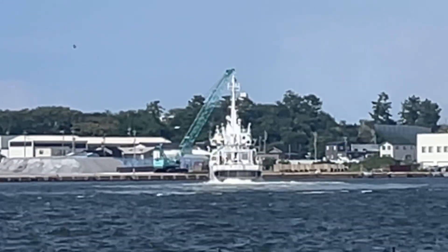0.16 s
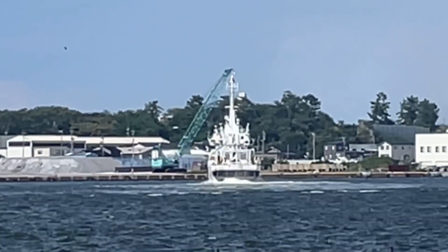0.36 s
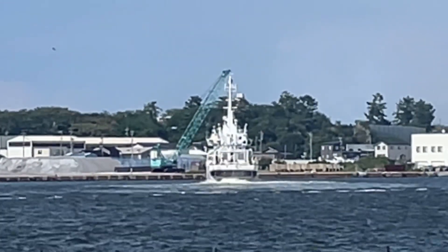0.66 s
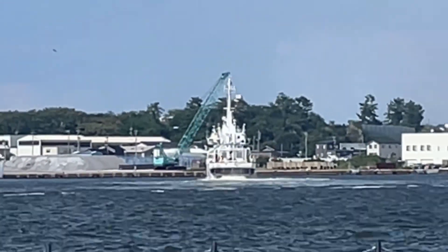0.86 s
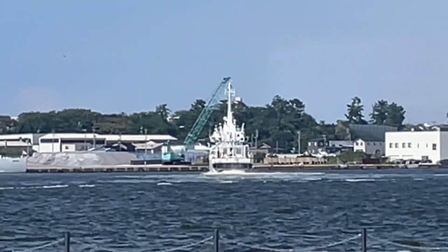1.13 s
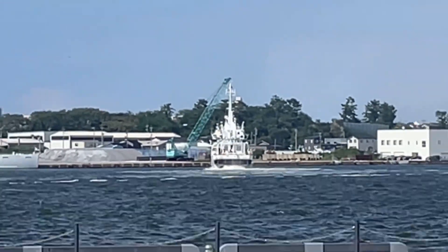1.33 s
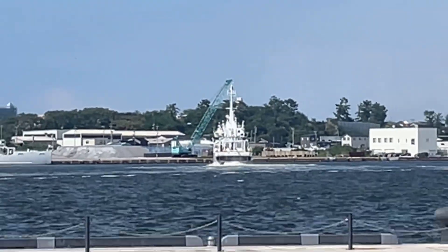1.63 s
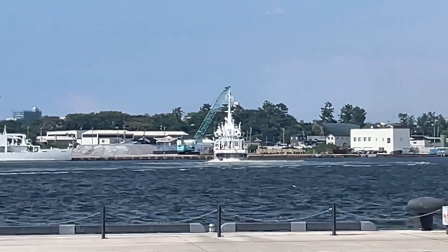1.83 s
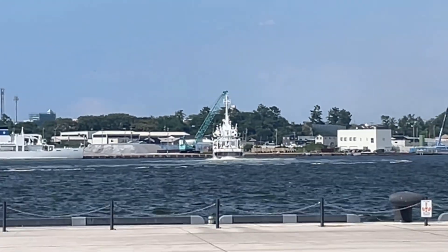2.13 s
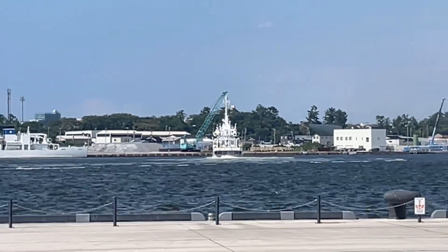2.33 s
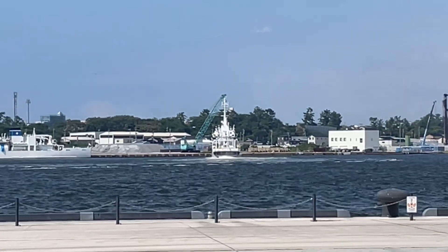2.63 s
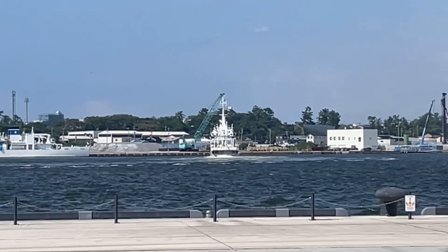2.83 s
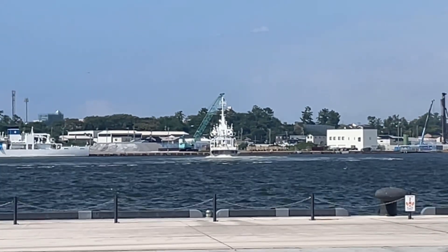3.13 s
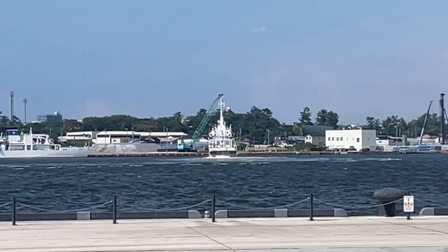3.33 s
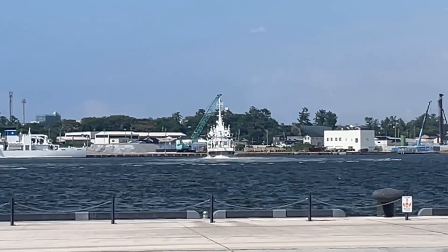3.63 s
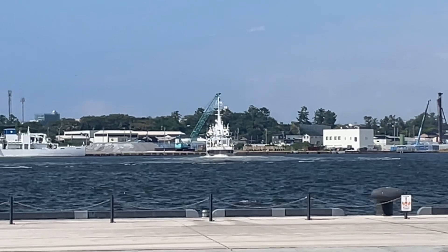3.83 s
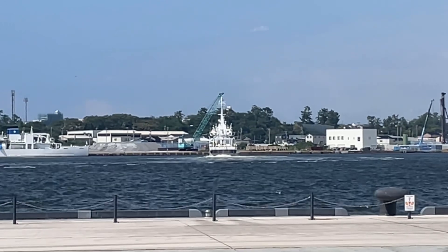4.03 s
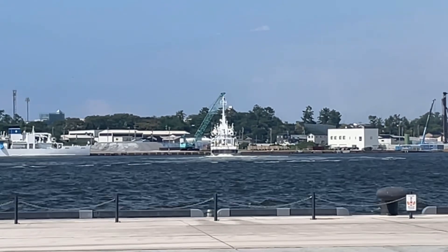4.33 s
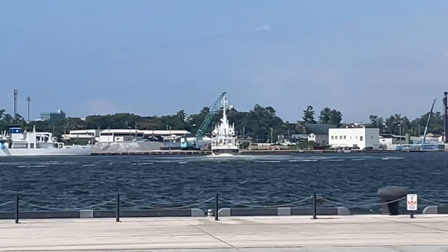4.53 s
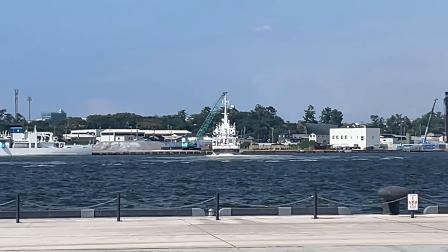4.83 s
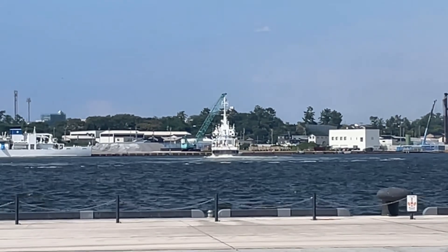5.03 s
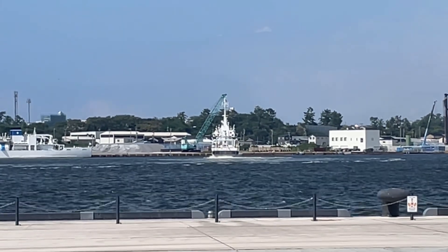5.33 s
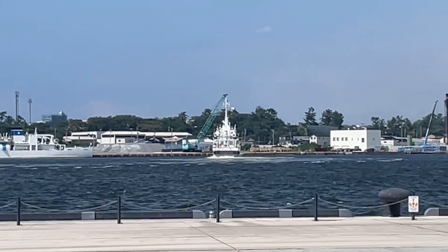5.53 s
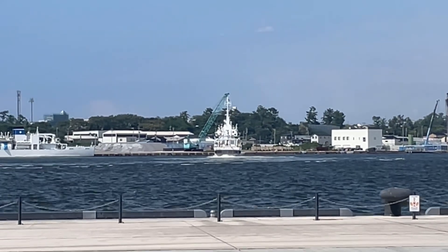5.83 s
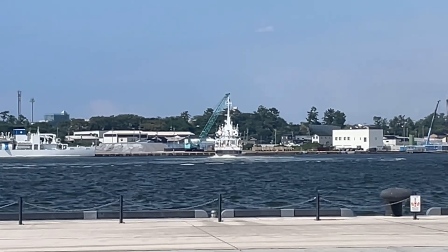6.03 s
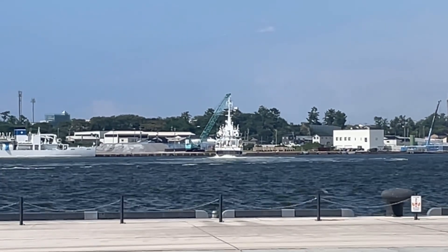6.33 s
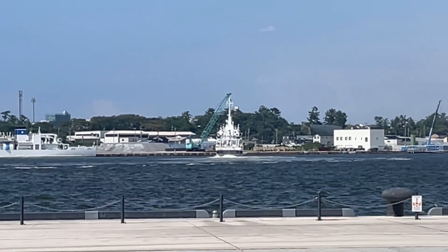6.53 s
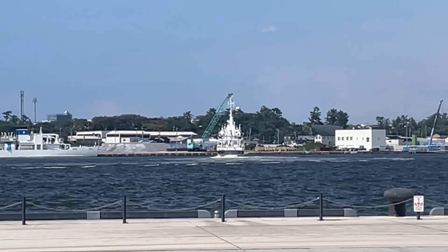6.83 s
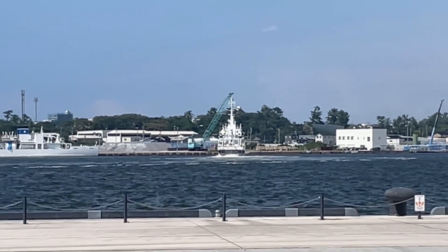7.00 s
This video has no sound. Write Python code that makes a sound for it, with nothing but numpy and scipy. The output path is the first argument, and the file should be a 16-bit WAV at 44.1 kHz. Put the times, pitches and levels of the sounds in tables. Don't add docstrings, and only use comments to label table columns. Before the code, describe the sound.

A distant vessel's low diesel drone pulses over softly hissing water, with small laps, late plops and a rough burst of wind buffeting.

```python
import sys
import numpy as np
from scipy import signal
from scipy.fft import rfft, irfft, next_fast_len
from scipy.io import wavfile
from scipy.ndimage import uniform_filter1d

SR = 44100
rng = np.random.default_rng(int(sys.argv[2]) if len(sys.argv) > 2 else 0)


def undo_db(level):
    steps = np.asarray(level, float) / 20
    return 10 ** steps


def store_wav(level_fs):
    pcm = np.round(np.clip(np.atleast_2d(level_fs), -1, 1) * 32767)
    wavfile.write(sys.argv[1], SR, pcm.T.astype(np.int16))


N = 315800
SIZE = next_fast_len(N)

# frequency in Hz, extra level on the left in dB.
LEAN = [(60, -0.46), (150, 0.7), (500, 0.3), (800, -1), (1700, 1), (3000, -0.9)]


def in_time(rows):
    s, *columns = np.transpose(rows)
    return [np.interp(np.arange(N) / SR, s, column) for column in columns]


def at_hz(points, hz):
    point_hz, value = np.transpose(points)
    return np.interp(np.log(hz), np.log(point_hz), value)


def swells(rows):
    t = np.arange(0, N + 64, 64) / SR
    total_db = sum(db * np.exp(-((t - s) / half_s) ** 2) for s, db, half_s in rows)
    return np.interp(np.arange(N) / SR, t, total_db)


def rms_one(x):
    return x / np.sqrt(np.mean(x ** 2) + 1e-20)


def drift(rate):
    r = np.exp(-200 * np.pi * rate / SR)
    noise = rng.standard_normal(N // 100 + 1002)
    slow = signal.lfilter([1], [1, -2 * r, r * r], noise)[1000:]
    return np.interp(np.arange(N) / 100, np.arange(len(slow)), rms_one(slow))


def spread(mid, side, lean_db=0):
    balance_db = np.reshape([lean_db / 2, -lean_db / 2], (2, -1))
    return (mid + side * np.array([[1], [-1]])) * undo_db(balance_db)


def heard(spectra):
    return irfft(spectra, SIZE)[..., :N]


def coloured(spectrum, alike_share=1., top_hz=20000):
    # frequency in Hz, likeness from 0 to 1.
    likeness = [(60, 0.96), (180, .95), (300, 0.9), (520, 0.2), (890, 0.7), (1800, .5), (2200, 0.97),
                (2700, 1), (6000, 1), (10000, 1)]
    hz = np.maximum(np.fft.rfftfreq(SIZE, 1 / SR), 10)
    colour = undo_db(at_hz(spectrum, hz)) / (1 + (hz / top_hz) ** 4)
    mid, side = rfft(rng.standard_normal((2, SIZE))) * colour
    alike = np.clip(alike_share * at_hz(likeness, hz), 0, 1)
    pair = spread(np.sqrt(1 + alike) * mid, np.sqrt(1 - alike) * side, at_hz(LEAN, hz))
    return hz, pair / np.sqrt(np.mean(heard(pair) ** 2))


def tone(hz, level_db, wander):
    phase = 2 * np.pi * (hz * np.arange(N) / SR + rng.random()) + wander * drift(.3)
    shift = rng.normal(0, 0.0011) * hz
    return np.sqrt(2) * undo_db(level_db) * spread(np.sin(phase), shift * np.cos(phase), at_hz(LEAN, hz))


def pop(clicks, hz, cycles):
    r = np.exp(-hz / cycles / SR)
    resonance = [1 - r * r, 0, r * r - 1, 1, -2 * r * np.cos(2 * np.pi * hz / SR), r * r]
    return signal.sosfilt([resonance, resonance], clicks + 1e-18)


def engines():
    # multiple of the engine cycle, level in dB.
    port = [(11, -40.5), (12, -47.5), (16, -50), (17, -44.5), (18, -47.5), (19, -47), (20, -55.5),
            (21, -71.5), (22, -42), (23, -49), (24, -49.5), (25, -41), (26, -42), (27, -49), (29, -51.5),
            (31, -57.5), (32, -46), (33, -54), (37, -61.5), (38, -56), (42, -72.5), (45, -61), (46, -56.5),
            (48, -63), (50, -73), (54, -65.5)]
    starboard = [(12, -52.5), (18, -42.5), (19, -61.5), (20, -50.5), (23, -41), (26, -49), (29, -46.5),
                 (31, -51.5), (32, -62.5), (37, -50), (38, -62.5), (39, -59.5), (53, -69), (54, -58.5)]
    stack_hz = [81.17, 150.7, 237.9]
    # time in seconds, level in dB.
    firing = [(0, -29.5), (.2, -25.5), (.6, -25), (.85, -31.5), (1.4, -30), (1.95, -26.5), (2.2, -28),
              (2.4, -23), (2.6, -31), (3.1, -26.5), (3.4, -32), (3.95, -37.5), (4.5, -21.5), (5.25, -22),
              (5.6, -34), (6.2, -24.5), (6.6, -36), (7.0, -26)]
    # seconds, change in dB,
    # half-length in seconds.
    second_fades = [(1.05, -2.5, 0.26), (1.43, -24, 0.24), (2.7, -7.5, 0.082), (3.02, -20.5, 0.21),
                    (3.45, -7.5, 0.2), (4.0, -11.5, 0.14), (4.4, -12, .1), (5.35, -20, 0.18),
                    (6.0, -3, 0.24), (6.47, -18.5, 0.2)]
    third_fades = [(.3, -1, 0.1), (1.35, -7.5, .3), (2.0, -7, 0.15), (2.95, -5.5, 0.35), (3.75, -21, 0.2),
                   (4.3, -14, 0.31), (5.05, -12, 0.17), (5.8, -4, 0.078), (7.16, -10.5, 0.16)]
    thirteenth_fades = [(.08, 12.5, 0.055), (.48, -6, 0.29), (2.7, -8, 0.043), (3.35, 2.5, 0.16),
                        (4.4, -24.5, 0.38), (5.52, 7, .09), (6.5, -3.5, .7)]
    port_cycle_hz, starboard_cycle_hz = 5.413, 5.378
    lines = [(k * port_cycle_hz, db) for k, db in port]
    lines += [(k * starboard_cycle_hz, db) for k, db in starboard]
    out = sum(tone(hz, db + 2 * drift(.4), wander=.35) for hz, db in lines)
    strong = [
        (stack_hz[0], in_time(firing)[0]),
        (stack_hz[1], -31.5 + swells(second_fades)),
        (stack_hz[2], -42 + swells(third_fades)),
        (13 * port_cycle_hz, -34.5 + swells(thirteenth_fades))]
    return out + sum(tone(hz, db, wander=.3) for hz, db in strong)


def generator():
    # frequency in Hz, level in dB.
    hum = [(89.1, -37.5), (90.85, -41), (158.7, -38)]
    # time in seconds, change in dB, half-length in seconds.
    fades = [(.97, -11.5, .15), (1.89, -8.5, .25), (2.4, -1, .15), (2.85, 0, .25), (3.5, 2, .2),
             (5.2, 2.5, .4), (5.6, -7.5, .1), (6.6, 0, .6)]
    return sum(tone(hz, db + swells(fades), wander=0.49) for hz, db in hum)


def rumble(gust_db):
    # frequency in Hz, level in dB per Hz.
    spectrum = [(25, -33.5), (45, -2), (60, 8.5), (80, 1), (95, -0.5), (115, -5.5), (145, -1.5), (175, -8),
                (240, -11.5), (300, -16), (420, -25.5), (700, -68)]
    # time in seconds, rise in dB, half-length in seconds.
    air_swells = [
        (.35, 2, 0.17),
        (1.3, -1, 0.42),
        (4.5, 3.5, 1),
        (5.9, 4.5, 0.27),
    ]
    rest_db, gust_share = -31.5, 0.13
    level_db = rest_db + swells(air_swells) + gust_share * gust_db
    return undo_db(level_db + 1.3 * drift(3.6)) * heard(coloured(spectrum, top_hz=720)[1])


def gust_strength():
    return swells([(0, 12, 0.11), (1.25, 10, .35), (5.4, 8, .5), (6.6, 19, 0.4), (6.235, 20.5, 0.062),
                   (6.36, 6.5, .025), (6.452, 12, 0.019), (6.56, 10.5, 0.049), (6.645, 11, 0.025),
                   (6.705, 12, 0.016), (6.86, 14, 0.051), (6.94, 23.5, 0.01), (7.06, 25, 0.032)])


def gusts(gust_db):
    # frequency in Hz, level in dB per Hz.
    spectrum = [(20, -33.5), (40, -11.5), (60, 14.5), (90, 13), (130, -1), (200, -23.5), (350, -27.5)]
    calm_db = -44
    wind = heard(coloured(spectrum, top_hz=350)[1])
    local = np.sqrt(uniform_filter1d(np.mean(wind ** 2, 0), size=2600) + .1)
    return undo_db(calm_db + gust_db) * wind / local ** .7


def splash_db():
    # time in seconds, rise of droplet density in dB.
    splashes = [
        (.8, 2.5),
        (1.3, 7.5),
        (1.92, 12.5),
        (2.8, 3.5),
        (3.5, 4.5),
        (3.8, 9),
        (4.08, 4),
        (6.299, 7),
        (6.92, 6),
    ]
    splash_s, rest_db = .07, 0.8
    return rest_db + swells([(s, db, splash_s) for s, db in splashes])


def wake():
    # frequency in Hz, level in dB per Hz.
    spectrum = [(200, -8), (330, -1), (500, -2.5), (900, -6.5), (1400, -14), (1750, -15.5), (2050, -16),
                (3000, -24.5), (5000, -31), (7000, -38.5), (8400, -39.5), (10500, -51), (12500, -47),
                (15200, -62)]
    # time in seconds, rise in dB, half-length in seconds, pitch in Hz.
    surges = [(0.847, 5.5, 0.18, 1142), (1.796, 3, 0.19, 1360), (2.096, 2.5, .25, 863),
              (2.103, 2.5, 0.32, 2197), (2.756, 1.5, 0.33, 2257), (4.303, 5.5, 1.2, 822),
              (4.3, 2, 1.4, 499), (3.896, 2.5, .2, 2240), (4.348, 6.5, 0.23, 1402), (4.7, 6.5, .25, 1450),
              (5.006, 3, 0.37, 2240), (5.252, 2, .3, 843), (6.499, 4.5, 1, 1360), (6.896, 3.5, 0.44, 950)]
    surge_octaves = .3
    edges_hz = [0, 680, 1080, 1300, 1750, 2900, 5200, 8500, SR]
    centres_hz = [480, 850, 1180, 1500, 2250, 3900, 6600, 11000]
    splash_shares = [0, 0, 0, 0, 0, .2, .24, .3]
    flickers_db = [.3, .3, .3, .3, .3, .4, .7, 1.2]
    hz, pair = coloured(spectrum)
    shared, splash = drift(20), splash_db()
    out = 0
    bands = zip(edges_hz, edges_hz[1:], centres_hz, splash_shares, flickers_db)
    for low, high, centre, share, flicker_db in bands:
        band = 1 / (1 + (low / hz) ** 16) - 1 / (1 + (high / hz) ** 16)
        near = []
        for s, db, half_s, pitch in surges:
            closeness = np.exp(-(np.log2(pitch / centre) / surge_octaves) ** 2)
            near.append((s, db * closeness, half_s))
        db = swells(near) + share * splash
        flicker = flicker_db * (shared + drift(50)) + 0.81 * drift(4.8)
        out = out + undo_db(db - np.mean(db) + flicker) * heard(pair * band)
    return undo_db(-48) * out


def spray():
    sizes = undo_db(4.2 * np.minimum(rng.exponential(1, N), 3.0)) * rng.choice([-1, 1], N)
    drops_per_s = 150 * undo_db(1.5 * splash_db() + 2 * drift(4))
    born = rng.random(N) < drops_per_s / SR
    dealt = rng.integers(0, 8, N)
    pitches = [(2000, 4), (2700, 4), (3300, 0.0), (4200, 2.0),
               (5300, -5.5), (6600, -6.5), (9300, -18.0), (10800, -17)]
    out = 0
    for k, (hz, db) in enumerate(pitches):
        out = out + undo_db(db) * pop(sizes * born * (dealt == k), hz, cycles=0.38)
    return undo_db(-59.5) * out


def ticks(table, cycles, gain_db):
    out, t = np.zeros(N + 600), np.arange(600) / SR
    for (s, db, hz), noise in zip(table, rng.standard_normal((len(table), 600))):
        ragged = .15 * noise * np.exp(-t / .002) * (t < .01)
        ring = pop(np.roll((t == 0) + ragged, 30), hz, cycles)
        start = round(s * SR)
        out[start:start + 600] += undo_db(db + gain_db) * ring / np.abs(ring).max()
    return out[:N]


def laps():
    return ticks([(0.0181, -55.5, 5330), (0.2919, -57.1, 6000), (0.7851, -56, 4700), (0.8825, -54.5, 5310),
                  (0.9836, -56.5, 6800), (1.2606, -50.5, 3730), (1.2845, -52, 5390), (1.3066, -46.6, 4740),
                  (1.3881, -54.5, 5380), (1.5676, -55.5, 5380), (1.8745, -57.5, 6780),
                  (1.8902, -53.0, 4740), (2.8042, -57, 6730), (3.199, -54, 6820), (3.5025, -49.5, 4200),
                  (3.5199, -53.4, 4160), (3.5297, -51.7, 6800), (3.7373, -56, 5340), (3.7893, -52, 4220),
                  (3.8412, -52, 5350), (4.054, -50, 4760), (4.0758, -56.4, 5990), (4.1375, -53.5, 6000),
                  (4.4355, -54, 4740), (4.8555, -51, 6750), (5.2858, -47, 4720), (5.662, -54.9, 5340),
                  (6.2857, -62, 6760), (6.8993, -46.5, 5900)], cycles=0.71, gain_db=1.0)


def bright_drops():
    return ticks([(0.17, -68.5, 9900), (0.254, -71, 10000), (0.2923, -71, 9200), (0.63, -59, 9040),
                  (0.9828, -65.5, 9050), (1.7654, -71, 9080), (1.8262, -71, 9160), (2.5149, -70, 8980),
                  (2.8042, -62.5, 9300), (3.0021, -66, 9000), (3.025, -70.5, 11020), (3.6401, -69, 9000),
                  (3.7808, -70, 10380), (4.0482, -64, 10750), (4.8544, -67.5, 8900), (5.1422, -58.5, 8900),
                  (5.5503, -65.5, 9870), (6.8672, -70, 8840), (6.8987, -55.5, 9680), (7.0, -66, 11400)], cycles=1.1, gain_db=5.5)


def bird():
    start_s, length_s, edge_s = .7, .175, .015
    level_db, sag_db, hz = -75, 7, 7340
    t = np.arange(N) / SR - start_s
    edge = np.clip(np.minimum(t, length_s - t) / edge_s, 0, 1)
    dip_db = sag_db * np.sin(np.pi * np.clip(t / length_s, 0, 1))
    return undo_db(level_db - dip_db) * edge ** 2 * np.sin(2 * np.pi * hz * t)


def plops():
    # start in seconds, level in dB, pitch in Hz, time to fall 60 dB in seconds.
    bubbles = [
        (6.752, -32, 410, .08),
        (7.035, -31, 330, .1),
        (6.41, -38, 370, .08),
        (6.922, -55, 3880, .06),
        (3.489, -52, 3600, .008),
        (2.66, -57, 3850, .02),
    ]
    out, t = np.zeros(N + 4000), np.arange(4000) / SR
    for s, db, hz, t60 in bubbles:
        start = round(s * SR)
        ring = np.tanh(t * hz / 2) * np.sin(2 * np.pi * hz * t)
        out[start:start + 4000] += undo_db(db - 60 * t / t60) * ring
    return out[:N]


def scene():
    # time in seconds, lean to the left in dB.
    turning = [
        (0, 1.8),
        (6.3, 1.44),
        (6.8, 1.3),
        (7.16, 0.9),
    ]
    gust_db = gust_strength()
    vessel = engines() + generator() + rumble(gust_db)
    water = wake() + spray() + laps() + bright_drops() + plops()
    return spread(vessel + gusts(gust_db) + water + bird(), 0, in_time(turning)[0])


def top_cut(x):
    return signal.sosfilt(signal.butter(12, 15140, fs=SR, output="sos"), x)


def record(dry):
    # lower edge in Hz, upper edge in Hz.
    side_kept_hz = [(0, 2350), (6250, 10500), (13100, 15200)]
    first_sample = [
        [-.188],
        [-.126],
    ]
    gap_hz = 8350
    sum_top_hz, image_hz = 13800, 12000
    hz, t = np.fft.rfftfreq(SIZE, 1 / SR), np.arange(N) / SR
    mid = rfft(dry[0] + dry[1], SIZE) / 2
    side = rfft(dry[0] - dry[1], SIZE) / 2
    turn = np.clip(np.pi / 2 + (hz - gap_hz) * .00065, 0, 4.0)
    kept = sum((hz >= low) & (hz < high) for low, high in side_kept_hz)
    port_sum = heard(mid * np.cos(turn) * (hz < sum_top_hz))
    port_difference = heard((side - 1j * mid * np.sin(turn)) * kept)
    ports = spread(port_sum, port_difference)
    ports += undo_db(-66.5) * dry.mean(0) * np.cos(2 * np.pi * image_hz * t)
    ports += (np.array(first_sample) - ports[:, :1]) * np.exp(-t / .003)
    return top_cut(ports)


dry = scene()
out = record(dry)
store_wav(out)
```